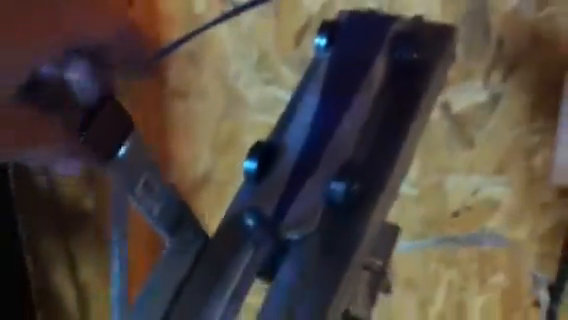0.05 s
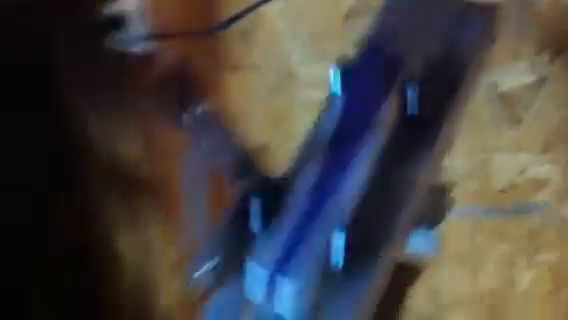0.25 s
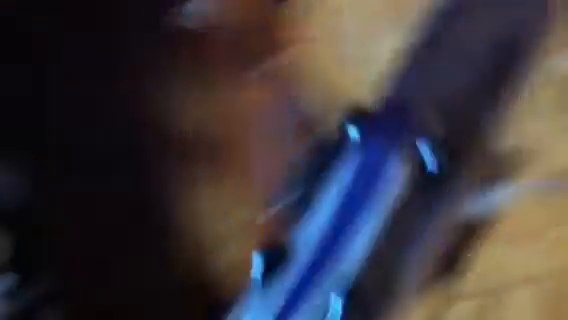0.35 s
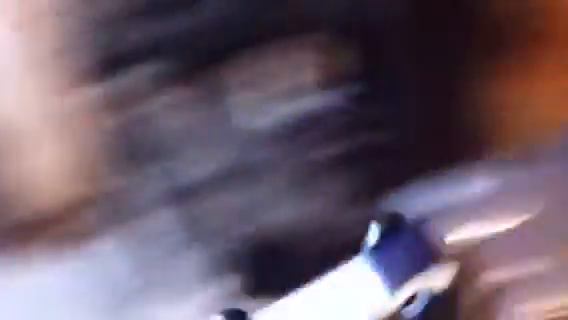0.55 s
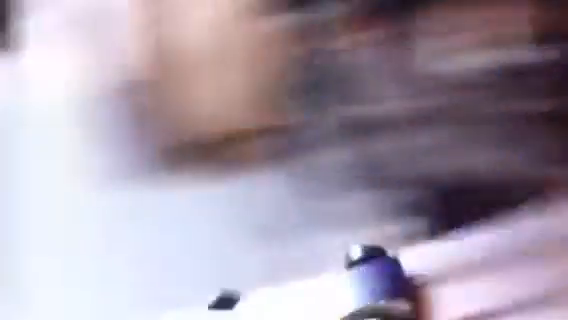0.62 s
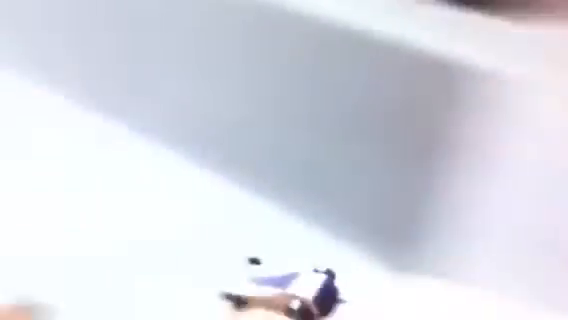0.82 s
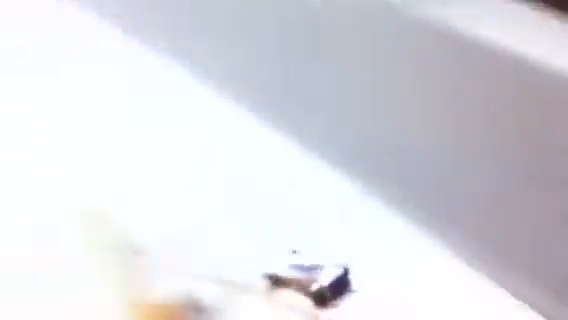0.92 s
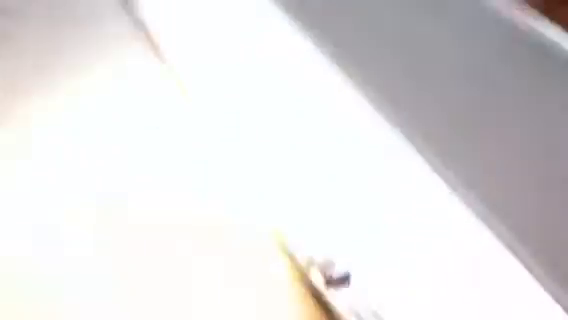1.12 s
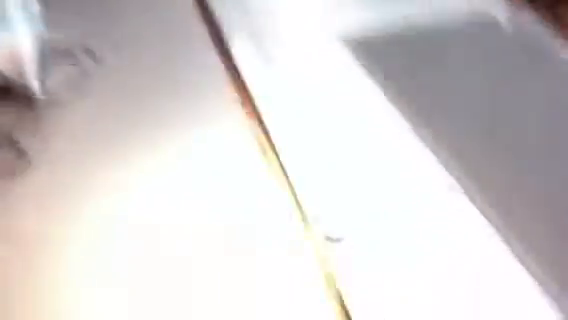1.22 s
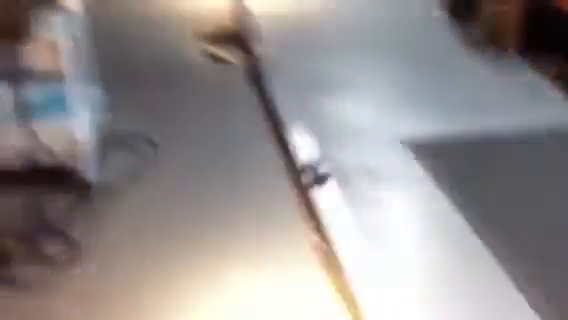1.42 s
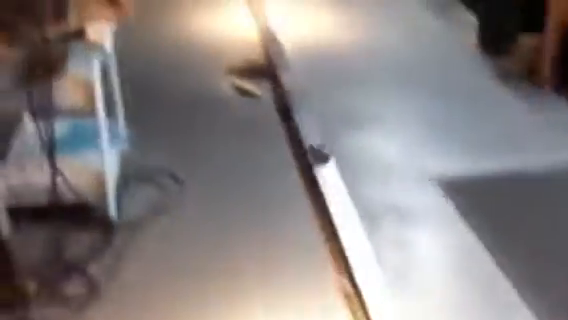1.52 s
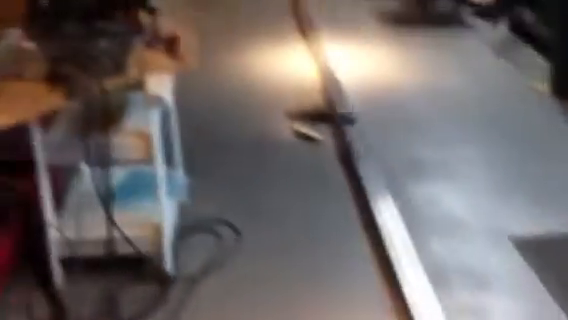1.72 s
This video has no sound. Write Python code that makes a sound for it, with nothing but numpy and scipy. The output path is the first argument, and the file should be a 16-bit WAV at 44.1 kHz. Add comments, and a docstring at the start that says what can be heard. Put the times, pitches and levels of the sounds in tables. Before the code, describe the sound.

A small wooden car rolls down a long track, released by a quick cluster of sharp, metallic gate clacks. Its rolling rush builds, with wheel ticks and a brief scrape, heard from near the gate in a workshop.

```python
"""In a workshop, a lever drops a starting gate: a few hard impacts excite the modes of gate and frame.
A small wooden car rolls down the ramp. Its wheels chatter on the track and force it into vibration,
brighter as the car gains speed; it rumbles and scrapes through the bend onto the flat and runs away.
The scene is heard from close to the gate, over faint room noise."""
import sys
import numpy as np
from scipy import signal
from scipy.fft import rfft, irfft
from scipy.io import wavfile

SR = 44100
rng = np.random.default_rng(int(sys.argv[2]) if len(sys.argv) > 2 else 0)


def inscribe(sig):
    """Save sig as 16-bit PCM at rate SR to the path in sys.argv[1].

    A 1-D sig is mono; a 2-D sig holds one channel per row.
    Samples are clipped to [-1, 1] before scaling.
    """
    pcm = np.round(np.clip(np.atleast_2d(sig).T, -1, 1) * 32767)
    wavfile.write(sys.argv[1], SR, pcm.astype(np.int16))


N = 77175
TIME = np.arange(N) / SR
ROLL_START_S, BEND_S = 0.33, 1.08
# response of the flat track to the wheels (frequency [Hz], relative level [dB])
FLAT_SPECTRUM = [(50, -64), (120, -36), (500, -19), (780, -14), (1000, -2), (1350, -2.5), (2100, 4),
                 (2800, 0.5), (3500, -6.5), (4300, -1.5), (5200, -9), (6600, -10.5), (7300, -15.5),
                 (8100, -12.5), (9200, -21), (10500, -27.5), (12200, -17.5), (14500, -31.5), (16000, -29)]


def amp(db):
    """Amplitude ratio of a level: a factor of ten per 20 dB."""
    return 10 ** (np.asarray(db) / 20)


def unit(x):
    """Normalisation to an rms of 1."""
    return x / np.sqrt(np.mean(x ** 2) + 1e-20)


def read(points, hz):
    """Interpolation of a table along a logarithmic frequency axis."""
    frequency, value = np.transpose(points)
    return np.interp(np.log(hz + 1), np.log(frequency + 1), value)


def add(mix, onset_s, sound):
    """Superposition: a sound adds to the mix from its onset."""
    part = mix[round(onset_s * SR):][:len(sound)]
    part += sound[:len(part)]


def colour(x, spectrum):
    """Minimum-phase filtering with unit energy and the given spectral shape."""
    log_gain = np.log(amp(read(spectrum, abs(np.fft.fftfreq(4096, 1 / SR)))))
    response = np.exp(np.conj(signal.hilbert(log_gain)))
    taps = np.fft.ifft(response).real[:2048]
    return signal.fftconvolve(x, taps / np.linalg.norm(taps))[:len(x)]


def resonate(x, hz, width_hz):
    """Forced resonance: two resonators in cascade, each width_hz wide, whose frequency may glide."""
    carrier = np.exp(2j * np.pi * np.cumsum(hz * np.ones(N)) / SR)
    pole = np.exp(-np.pi * width_hz / SR)
    for _ in range(2):
        x = (carrier * signal.lfilter([1 - pole], [1, -pole], x / carrier)).real
    return x


def below(x, hz):
    """Zero-phase low-pass filtering."""
    return irfft(rfft(x) / (1 + (np.fft.rfftfreq(N, 1 / SR) / hz) ** 8), N)


def ring(modes, t):
    """Free vibration: exponentially damped modes in random phase, with an initial rms of 1."""
    initial_rms = np.sqrt(sum(amp(db) ** 2 for _, db, _ in modes) / 2)
    return sum(amp(db - 60 * t / t60) * np.sin(2 * np.pi * (hz * t + rng.random()))
               for hz, db, t60 in modes) / initial_rms


def room_noise():
    """Stationary coloured noise: the faint background of the workshop."""
    # background spectrum (frequency [Hz], relative level [dB])
    spectrum = [(25, -34), (75, -24), (115, -16), (170, -13), (330, -3.5), (420, -9.5), (700, -17),
                (1400, -23.5), (1850, -19.5), (2060, -12), (2500, -24.5), (8500, -26), (9700, -22),
                (12600, -28), (16000, -29)]
    return amp(-61) * unit(colour(rng.standard_normal(N), spectrum))


def reverberation(x):
    """Diffuse reflections: each frequency band decays exponentially at its own rate."""
    # reverberation time of the workshop (frequency [Hz], T60 [s])
    decay_times = [(100, 0.12), (400, 0.75), (1500, 0.46), (5000, 0.42), (14000, 0.41)]
    hz, t, bands = signal.stft(rng.standard_normal(SR), SR, nperseg=256)
    decay = amp(-60 * t / read(decay_times, hz)[:, None])
    tail = signal.istft(bands * decay, SR, nperseg=256)[1]
    tail *= np.clip(np.arange(len(tail)) / SR / 0.011, 0, 1)  # reflections build up over 11 ms
    return signal.fftconvolve(x, tail / np.linalg.norm(tail))[:N]


def track_thumps():
    """Transient loading: the track gives a dull thump under the falling gate and under the car."""
    # thumps of the track (time [s], level [dB])
    thumps = [(0.231, -48.5), (.297, -38.5), (1.099, -53.5), (1.255, -49.5), (1.294, -57), (1.343, -56),
              (1.479, -68)]
    # spectrum of a thump (frequency [Hz], relative level [dB])
    spectrum = [(30, -10), (70, -6), (130, -5), (200, 2.5), (300, 4.5), (800, -44)]
    out, t = np.zeros(N), np.arange(SR // 10) / SR
    peak_s = 0.0093
    envelope = t / peak_s * np.exp(1 - t / peak_s)
    for onset_s, db in thumps:
        add(out, onset_s, amp(db) * colour(rng.standard_normal(len(t)) * envelope, spectrum))
    return out


def wheel_knocks():
    """Impact excitation: a wheel striking a joint or the guide rail gives a tick and one damped mode."""
    # knocks of the wheels (time [s], level [dB], mode frequency [Hz])
    knocks = [(.5223, -31.5, 2515), (.7398, -48, 2250), (0.8024, -28, 2360), (.8445, -36, 1006),
              (.8889, -32, 2430), (0.9493, -26.5, 1805), (1.078, -29, 1162), (1.2386, -34, 2650),
              (1.3105, -38, 2400), (1.3736, -23.5, 2020), (1.3957, -26, 1825), (1.448, -31, 2620),
              (1.6293, -32, 2140), (1.718, -32, 1061)]
    out, t = np.zeros(N), np.arange(SR // 10) / SR
    t60, tick_decay_s = 0.046, 0.0029
    for onset_s, db, hz in knocks:
        attack = 1 - np.exp(-t * hz / 2)
        tone = np.sin(2 * np.pi * hz * t) * amp(-60 * t / t60) * attack
        tick = colour(rng.standard_normal(len(t)) * np.exp(-t / tick_decay_s), FLAT_SPECTRUM)
        add(out, onset_s, amp(db) * (tone + amp(-5) * tick))
    return out


def gate():
    """Modal response to impact: each blow is a dense rattle that leaves frame and gate ringing."""
    # blows of the gate (time [s], rattle level [dB], rise constant [s], T60 [s],
    # metallic share [0-1], frame level [dB], gate level [dB])
    blows = [(0.2021, -38, .0006, 0.024, 0.5, -72, -79), (0.2335, -20, 0.0015, 0.085, 0.02, -23.5, -35),
             (0.2589, -8.5, 0.0007, 0.066, 0.41, -22, -21), (0.2840, -44, .001, 0.058, .0, -23.5, -50),
             (0.2966, -15, 0.0022, 0.16, 0.7, -45, -26.5), (0.3070, -8, 0.0023, 0.077, 0.83, -31, -21),
             (0.3450, -16, 0.0021, 0.084, 0.75, -30, -48), (0.4190, -38, 0.0018, 0.097, 1., -53, -55)]
    # spectra of a dull and of a metallic blow (frequency [Hz], relative level [dB])
    dull_spectrum = [(35, -70), (60, -32), (308, -8.5), (651, -9.5), (862, 0), (1410, -16.5), (2000, -7),
                     (4120, -15.5), (4420, -13), (6740, -10), (10500, -31), (13900, -22), (16000, -38)]
    metallic_spectrum = [(35, -75), (60, -33), (250, -35), (323, -9.5), (579, -24.5), (698, -9.5),
                         (1220, 0), (1440, -4), (2470, -1.5), (2710, -10.5), (3190, -3.5), (6580, -10.5),
                         (16000, -17.5)]
    # modes of the wooden frame and of the metal gate (frequency [Hz], relative level [dB], T60 [s])
    frame_modes = [(304, -10, .14), (350, -11, .25), (454, -7, .11), (737, -8, .18), (825, -1, .22),
                   (888, -2, .2), (938, -4, .16), (1011, -4, .17), (1071, -1, .22), (1109, -2, .22),
                   (1178, -1, .2), (1402, -7, .24), (2046, -5, .13), (2600, -7, .1)]
    gate_modes = [(331, -11, .44), (705, -15, .45), (991, -3, .25), (1527, -5, .42), (1779, -4, .24),
                  (1865, -1, .18), (1995, 0, .2), (2453, -2, .14), (3500, -1, .13), (3523, -5, .14),
                  (4420, -3, .11), (5300, -6, .1), (5972, -2, .13), (6837, -7, .13)]
    out, t = np.zeros(N), np.arange(SR // 2) / SR
    mode_attack = 1 - np.exp(-t / 0.0018)
    for onset_s, db, rise_s, t60, metal, frame_db, gate_db in blows:
        attack = 1 - np.exp(-t / rise_s)
        burst = rng.standard_normal(len(t)) * attack * amp(db - 60 * t / t60)
        rattle = (1 - metal) * colour(burst, dull_spectrum) + metal * colour(burst, metallic_spectrum)
        ringing = amp(frame_db) * ring(frame_modes, t) + amp(gate_db) * ring(gate_modes, t)
        add(out, onset_s, rattle + mode_attack * ringing)
    return out


def wheel_contact():
    """Roughness excitation: tiny impacts and hiss, slightly modulated by wheel rotation and chatter."""
    impacts_per_s, spread_db, hiss_share = 3000, 2.5, 0.71
    start_hz, gain_hz_per_s, wobble_db = 24, 28, -0.1
    chatter_hz, chatter_db = 68.4, 0.5
    strengths = rng.standard_normal(N) * amp(spread_db * np.minimum(rng.exponential(1, N), 4))
    impacts = strengths * (rng.random(N) < impacts_per_s / SR)
    contact = np.sqrt(1 - hiss_share) * unit(impacts) + np.sqrt(hiss_share) * rng.standard_normal(N)
    # uniform acceleration as far as the bend, then constant speed
    rotation_hz = start_hz + gain_hz_per_s * (np.minimum(TIME, BEND_S) - ROLL_START_S)
    chatter = unit(below(rng.standard_normal(N), chatter_hz))
    wobble = np.sin(2 * np.pi * (np.cumsum(rotation_hz) / SR + rng.random()))
    return unit(contact * amp(wobble_db * wobble + chatter_db * chatter))


def track_rumble(contact):
    """Forced vibration at low frequency: the track rumbles, most strongly just after the bend."""
    # envelope of the rumble (time [s], relative level [dB])
    envelope = [(0.47, -74), (0.494, -70), (0.776, -57), (1.05, -55), (1.194, -60), (1.268, -48.5),
                (1.558, -62.5), (1.74, -67)]
    # low-frequency response of the track (frequency [Hz], relative level [dB])
    spectrum = [(30, -37), (70, -26), (120, -14), (185, 6.5), (270, 5), (380, -1), (500, -14), (700, -25),
                (2000, -39)]
    return amp(np.interp(TIME, *np.transpose(envelope)) - 5) * unit(colour(contact, spectrum))


def track_resonances():
    """Local resonance: each stretch of track sings in narrow bands while the car crosses it."""
    # resonances (start [s], end [s], frequency [Hz], width [Hz], relative level [dB])
    resonances = [(.93, 1.13, 431, 28, -56), (.66, 1.03, 710, 30, -53.5), (1.12, 1.42, 803, 30, -52),
                  (.76, .92, 1000, 45, -42.5), (1.02, 1.13, 1185, 50, -47), (1.42, 1.85, 1030, 130, -46),
                  (.58, .69, 1640, 20, -44), (.74, 1.02, 1790, 130, -42), (1.22, 1.31, 4350, 500, -43),
                  (.56, .95, 2340, 200, -41.5), (1.44, 1.85, 4280, 450, -43.5), (.7, 1.22, 5880, 320, -52),
                  (1.22, 1.64, 6720, 220, -47.5), (.7, 1.19, 7900, 320, -52)]
    out, fade_s = np.zeros(N), 0.054
    for start, end, hz, width_hz, db in resonances:
        crossing = np.clip(np.minimum(TIME - start, end - TIME) / fade_s + 0.5, 0, 1)
        out += crossing * amp(db - 1.45) * unit(resonate(rng.standard_normal(N), hz, width_hz))
    return out


def wheel_scrape():
    """Sliding friction: a wheel scrapes through the bend, driving a broad resonance that falls in pitch."""
    # course of the scrape (time [s], resonance frequency [Hz], level [dB])
    course = [(1.2, 2650, -50), (1.26, 2640, -35), (1.32, 2550, -31.5), (1.35, 2300, -48),
              (1.39, 1800, -34), (1.42, 1780, -40), (1.48, 1820, -58)]
    times, hz, db = np.transpose(course)
    friction = resonate(wheel_contact(), np.interp(TIME, times, hz), width_hz=930)
    return np.interp(TIME, times, amp(db), left=0, right=0) * unit(friction)


def rolling_noise(contact):
    """Source and filter: the contact noise is shaped by the response of the ramp, then of the flat."""
    # response of the ramp to the wheels (frequency [Hz], relative level [dB])
    ramp_spectrum = [(50, -60), (120, -51), (500, -17.5), (600, -34.5), (700, -14.5), (850, -16.5),
                     (980, -3.5), (1350, -7), (1800, -4.5), (2450, 0.5), (3100, -9), (4300, -8.5),
                     (6200, -15), (7200, -17.5), (8000, -18.5), (9200, -23.5), (10500, -30), (12200, -20.5),
                     (14500, -36), (16000, -30.5)]
    # relative band levels along the run (time [s], body [dB], middle [dB], treble [dB], top [dB])
    envelopes = [(0.47, -50.5, -44.5, -55.5, -56), (0.56, -46.5, -43, -48, -70.5),
                 (0.708, -43.5, -39.5, -44, -54.5), (0.88, -44, -38, -44, -54.5),
                 (0.964, -42, -43, -40.5, -55.5), (1.156, -42.5, -40.5, -37.5, -50),
                 (1.178, -40, -40.5, -42, -52.5), (1.27, -41, -34.5, -37, -49.5),
                 (1.414, -41.5, -34.5, -39, -52.5), (1.424, -39, -34.5, -41.5, -46.5),
                 (1.458, -44.5, -31, -38, -49), (1.48, -34.5, -38, -37, -51),
                 (1.498, -43.5, -35.5, -39.5, -53.5), (1.7, -38.5, -38, -37.5, -54.5),
                 (1.73, -39, -37.5, -36.5, -52)]
    band_gains_db, bend_length_s = [-2, -2.5, -1.43, 1.4], 0.12
    on_flat = np.clip((TIME - BEND_S) / bend_length_s + 0.5, 0, 1)
    rush = (1 - on_flat) * colour(contact, ramp_spectrum) + on_flat * colour(contact, FLAT_SPECTRUM)
    low, mid, high = below(rush, 1500), below(rush, 3500), below(rush, 9000)
    bands = [low, mid - low, high - mid, rush - high]
    times, *levels = np.transpose(envelopes)
    return sum(unit(band) * amp(np.interp(TIME, times, level) + gain_db)
               for band, level, gain_db in zip(bands, levels, band_gains_db))


def car():
    """Structure-borne sound: the wheels drive the track, fading in as the car starts to roll."""
    contact = wheel_contact()
    vibration = rolling_noise(contact) + track_resonances() + track_rumble(contact) + wheel_scrape()
    rise_s = 0.16
    return vibration * np.clip((TIME - ROLL_START_S) / rise_s, 0, 1)


def scene():
    """Superposition of background, impacts, their reverberation and the car, alike in both channels."""
    impacts = gate() + wheel_knocks() + track_thumps()
    mono = room_noise() + impacts + amp(-12) * reverberation(impacts) + car()
    return np.array([mono, mono])


def record(dry):
    """Band limiting: a linear-phase low-pass removes the highest treble."""
    cutoff_hz = 16100
    taps = signal.firwin(511, cutoff_hz, window=("kaiser", 9), fs=SR)
    return signal.oaconvolve(dry, taps[None], "same")


dry = scene()
out = record(dry)
inscribe(out)
```